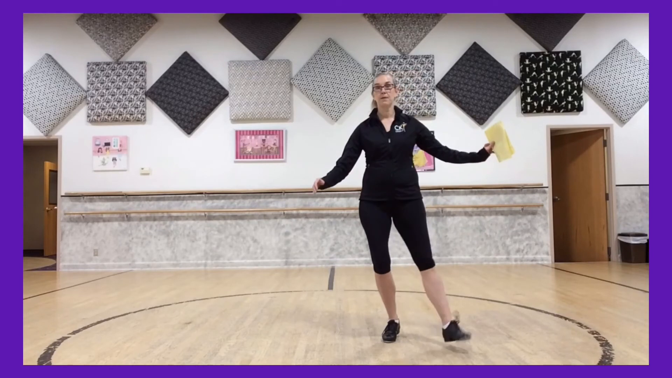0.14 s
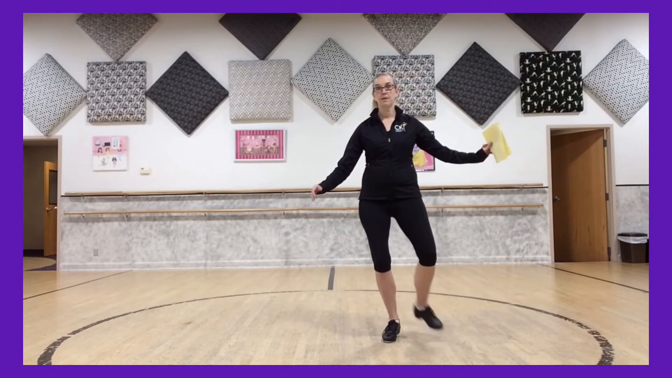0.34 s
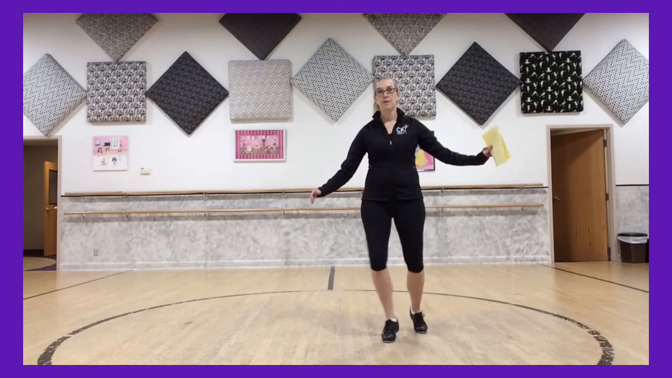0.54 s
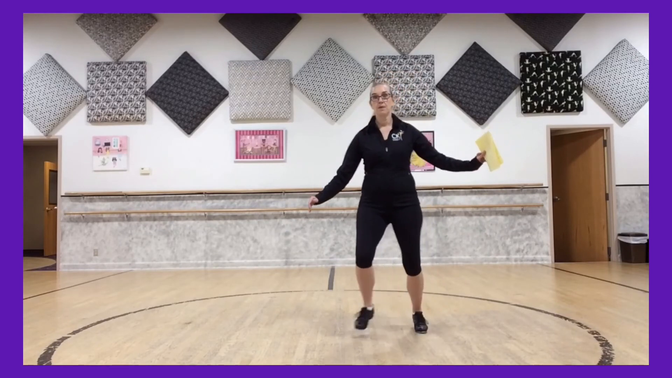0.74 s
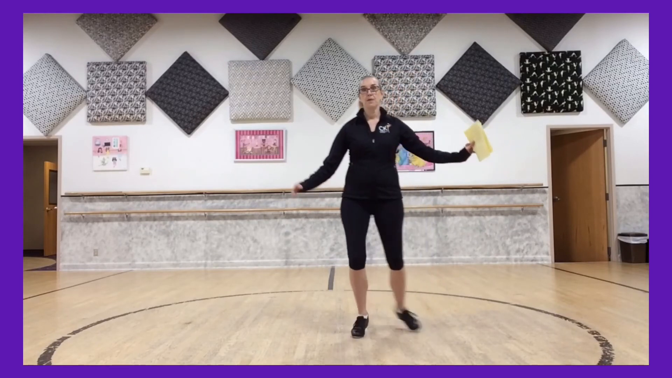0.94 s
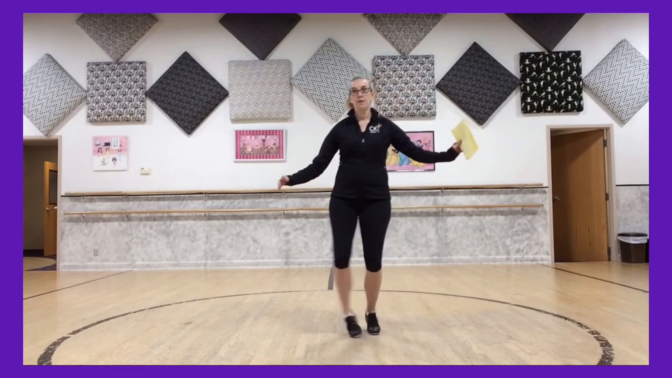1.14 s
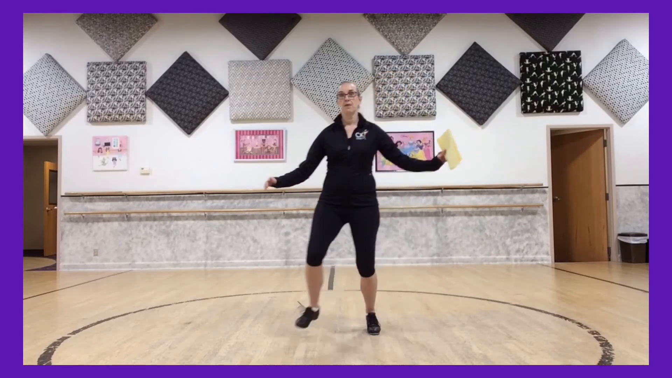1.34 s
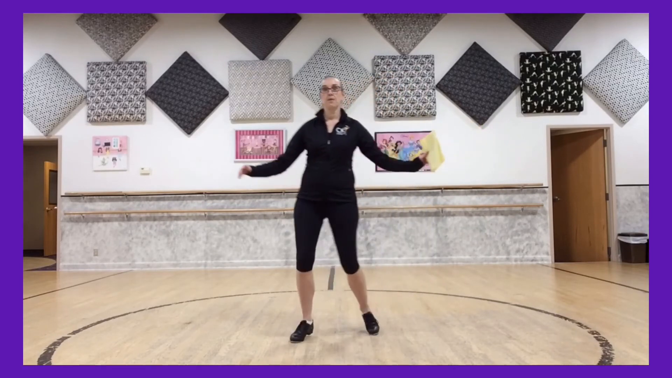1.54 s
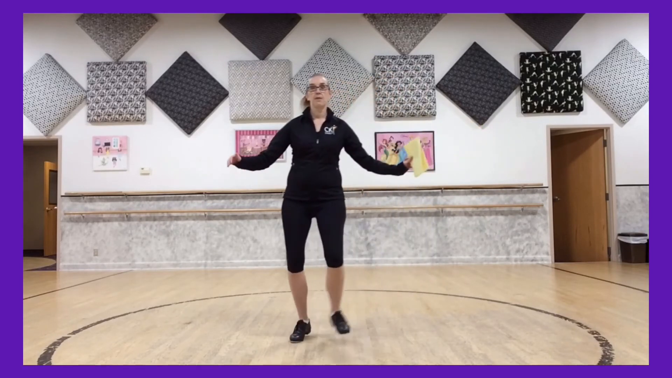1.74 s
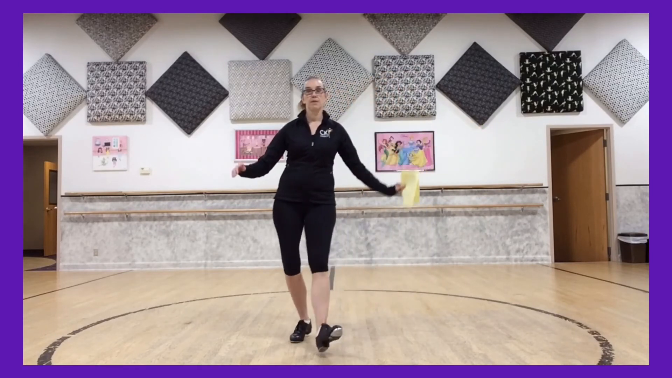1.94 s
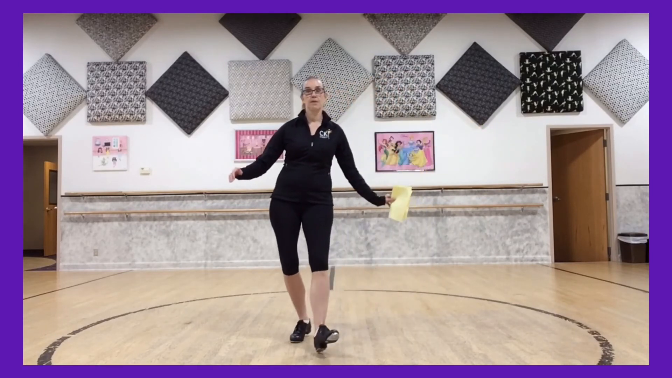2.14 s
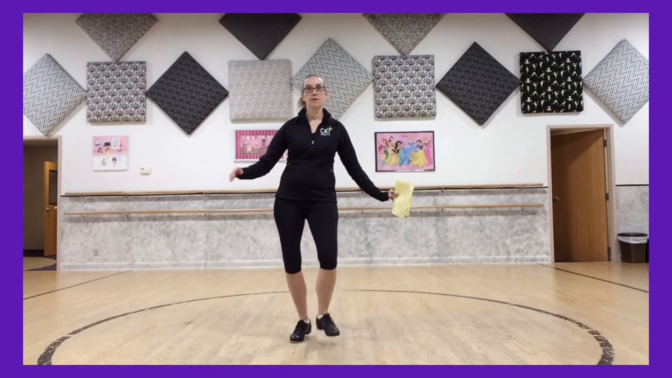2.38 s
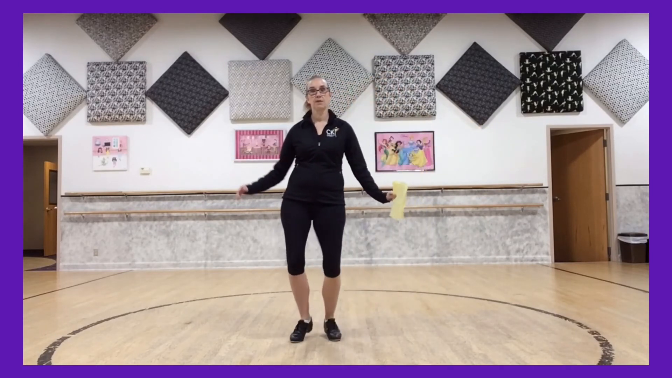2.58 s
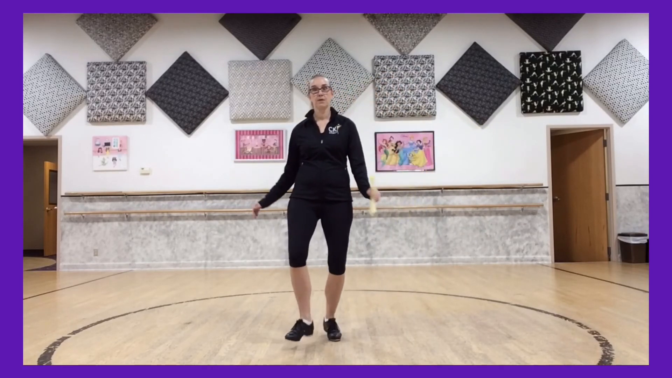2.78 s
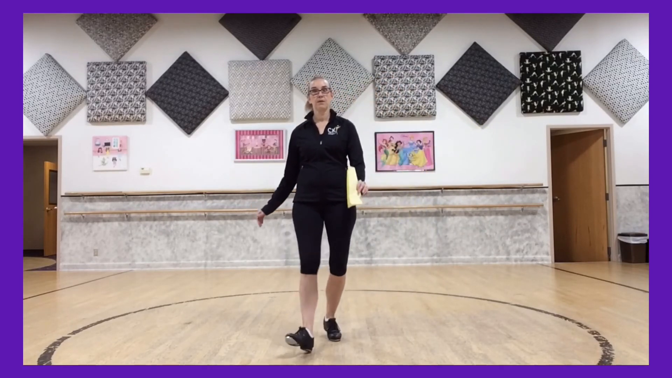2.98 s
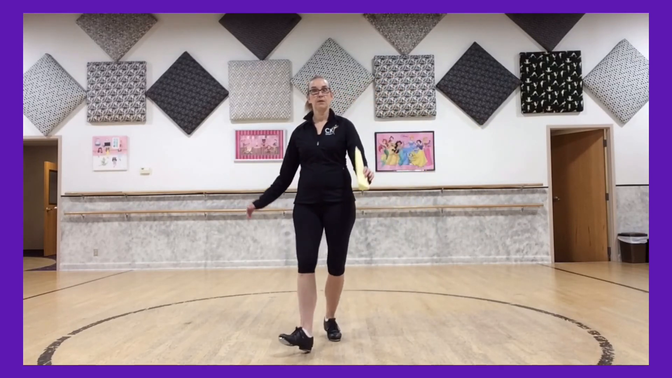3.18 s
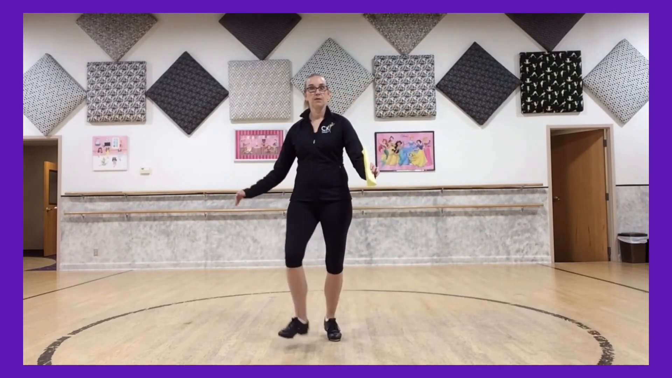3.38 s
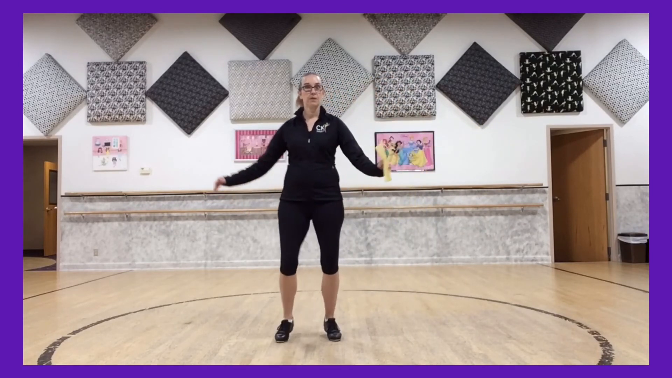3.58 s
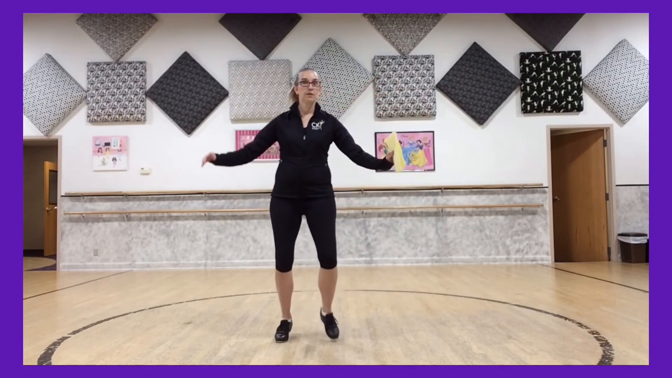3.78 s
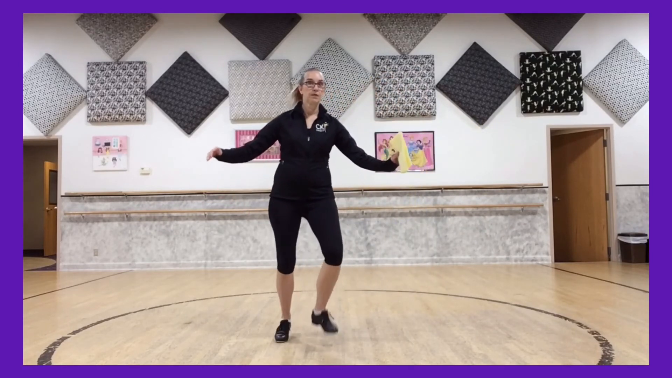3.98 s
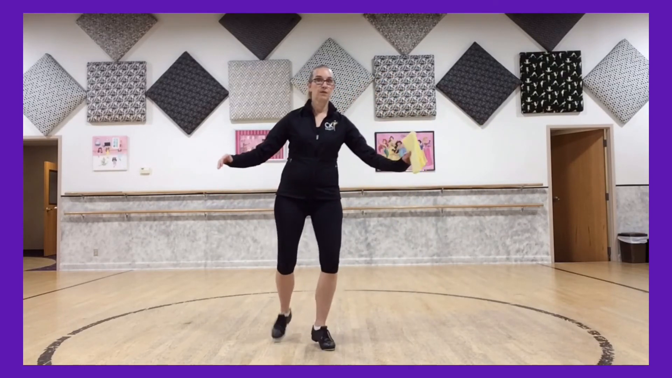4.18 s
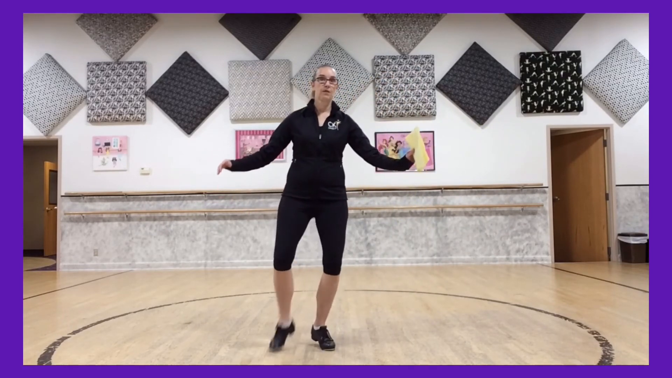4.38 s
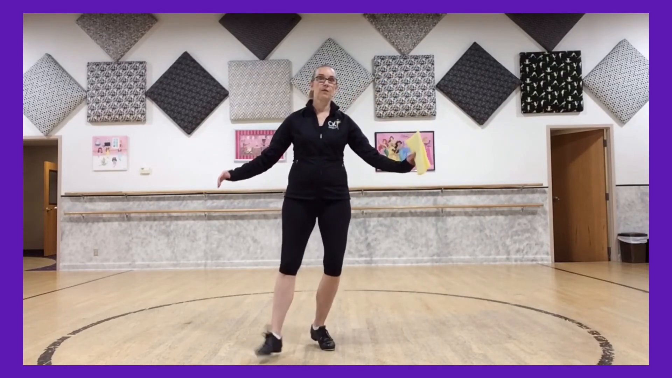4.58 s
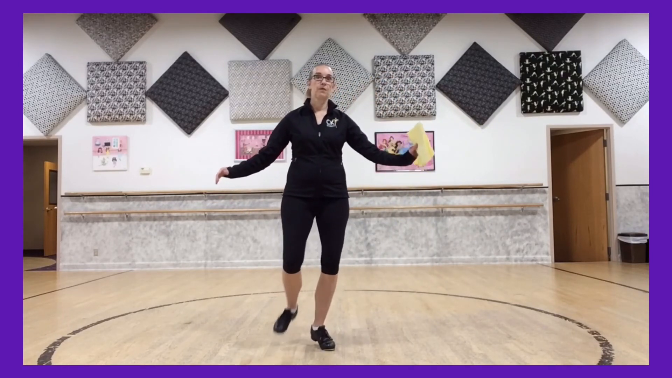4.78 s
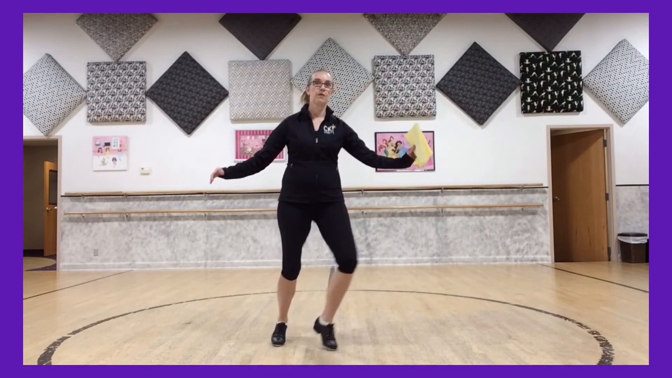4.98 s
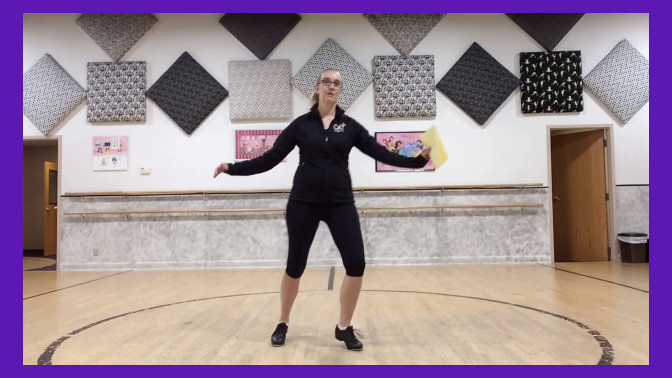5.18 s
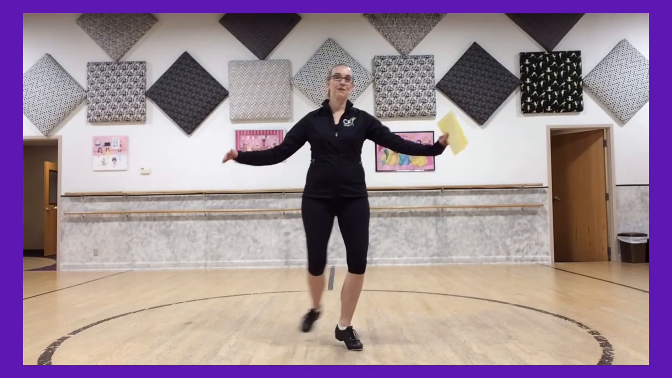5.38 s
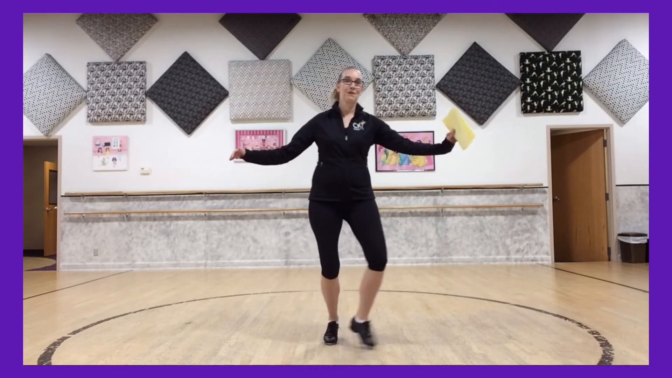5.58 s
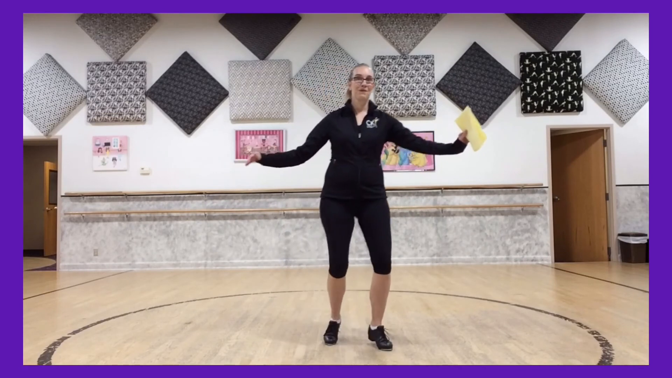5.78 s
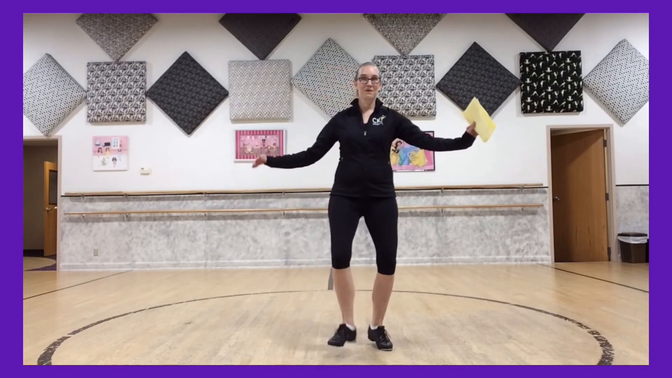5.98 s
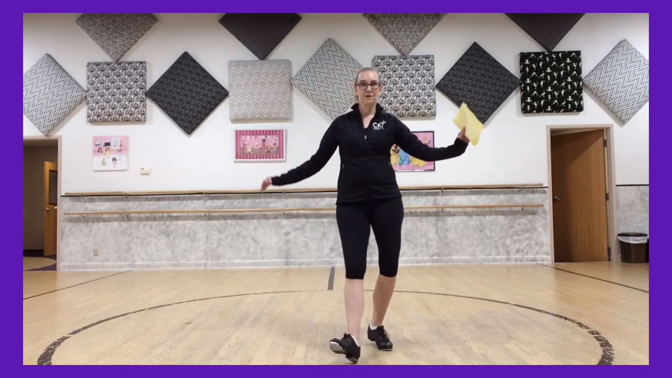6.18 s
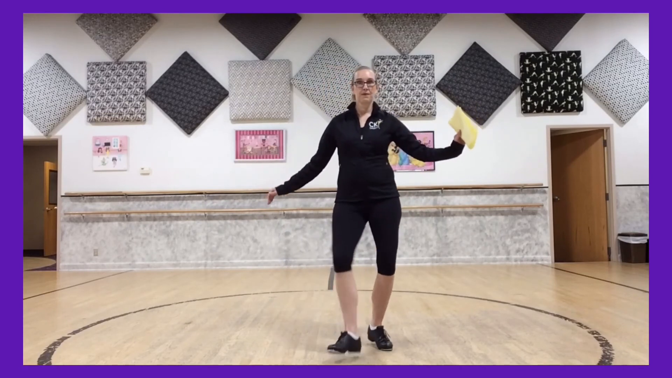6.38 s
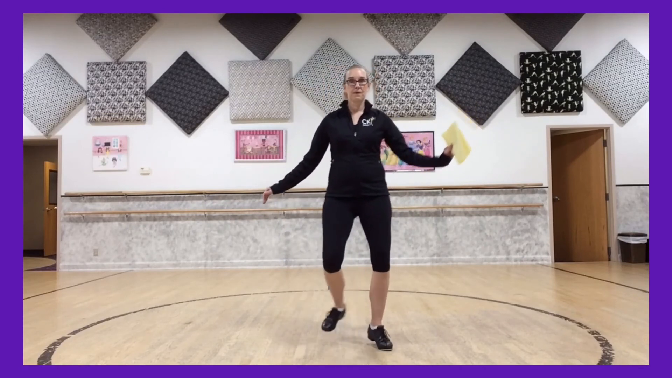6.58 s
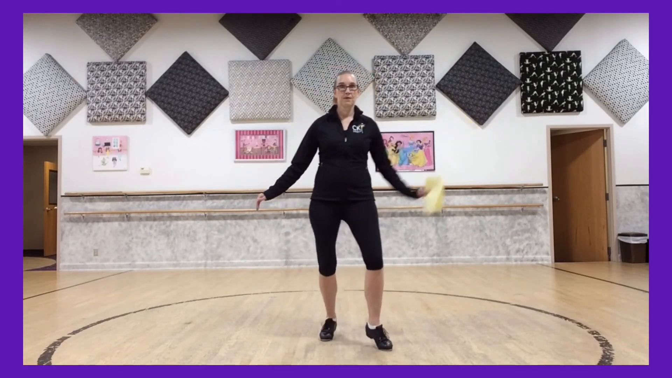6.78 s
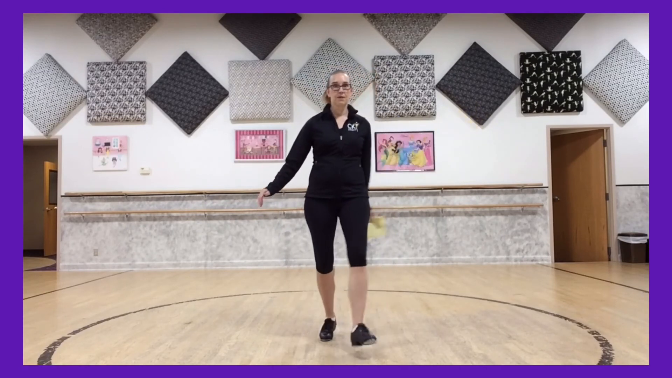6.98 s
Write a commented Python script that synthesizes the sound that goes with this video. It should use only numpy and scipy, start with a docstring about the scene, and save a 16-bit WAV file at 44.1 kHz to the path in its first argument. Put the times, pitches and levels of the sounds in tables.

```python
"""Tap steps in a live hall

A dancer in tap shoes steps out a slow phrase on the sprung wooden floor of a large, live hall, heard in one
channel by a microphone a few metres away. Each step is a glided knock (the bending wave in the boards), filtered
noise bursts for the click of the metal plate, and a low resonance for the floor's thump. Scattered bursts make the
wall echoes and banded, decaying noise makes about a second of reverberation, all over faint, steady room noise.
"""
import sys
import numpy as np
from scipy import signal
from scipy.fft import rfft, irfft
from scipy.io import wavfile

SR = 44100
rng = np.random.default_rng(int(sys.argv[2]) if len(sys.argv) > 2 else 0)


def file_out(sig):
    """Save sig as 16-bit WAV at sys.argv[1]."""
    # one column per channel
    cols = np.atleast_2d(sig).T
    # limit, then scale
    lim = np.clip(cols, -1, 1)
    pcm = np.round(lim * 32767).astype(np.int16)
    wavfile.write(sys.argv[1], SR, pcm)


N = 310023

# resonances and dips of boards and shoe, common to all steps: (centre [Hz], width [Hz], level [dB])
BODY_RESONANCES = [(31.77, 12, -6), (178.4, 39, 5.5), (312, 100, -1.5), (359, 28, 4), (465.4, 84, 6.5),
                   (602, 90, -2), (810, 107, 2), (1250, 290, -2), (2695, 150, 3), (10200, 810, 2.5)]
# basic spectrum of the plate's click: (frequency [Hz], level [dB])
CLICK_SPECTRUM = [(100, -26), (500, -5.5), (1100, -5), (2000, -0.5), (3200, 1.5), (6000, 0.5), (10000, 4.5),
                  (12500, -3.5), (16000, -6.5)]
# reverberation time of the hall, for a fall of 60 dB: (frequency [Hz], time [s])
HALL_DECAY = [(60, 0.57), (160, 0.97), (420, 0.85), (1100, 1.063), (2900, 0.95), (5500, 0.79), (8000, 0.49),
              (13000, 0.24)]
# first echoes from ceiling and walls: (delay [s], level [dB])
WALL_ECHOES = [(0.0133, -24.5), (0.017, -16.5), (0.0264, -12.5), (0.0313, -18), (.035, -13)]
# spectrum of the room noise: (frequency [Hz], level [dB per Hz])
ROOM_SPECTRUM = [(25, -101), (70, -83), (124, -84), (200, -88), (320, -100.5), (470, -85.5), (1100, -102),
                 (3000, -110), (6000, -117), (13000, -120), (16000, -138)]
# steps on the toe plate, the first one just before the start, so that only its tail is heard:
# (time [s], strike [dB], hardness of the contact [dB], board [dB], board pitch [Hz],
#  floor thump [dB], thump pitch [Hz], strongest plate resonance [Hz])
TOE_STEPS = [(-0.26, 7, -5, 14, 900, 19, 144, 2900), (0.028, 3.5, -2, 5, 1290, 13, 167, 5050),
             (0.2382, 8.5, 1, 12.5, 1076, 23, 144, 3100), (0.5574, 7.5, -7.5, -6, 995, 27, 180, 2670),
             (0.841, 6, 3.5, 14, 770, 23, 120, 2640), (1.157, 6.5, -2.5, 9, 840, 26, 151, 2380),
             (1.456, 8, 4.5, 15.5, 858, 28.5, 86.6, 7800), (2.519, 3.5, -1.5, 10, 824, 16, 210, 6030),
             (3.5414, 3, -1.5, 15, 800, 18, 105, 2580), (4.084, 9, 6.5, 21, 785, 26, 155, 2200),
             (4.4329, 6.5, -3.5, 12, 880, 18.5, 137, 4100), (4.649, 5, 6, 15, 810, 27, 122, 4800),
             (4.9481, 6.5, -2, 16.5, 784, 33, 83.5, 5400), (5.1812, 6, 3.5, 15.5, 835, 24, 122, 2810),
             (5.506, 10, -1, 18, 800, 19, 147, 9430), (5.7129, 2.5, -3, 11, 770, 19.5, 141, 3360),
             (6.6869, 8, -6, 15, 850, 18.5, 173.6, 4570)]
# heel drops: (time [s], strike [dB], hardness of the contact [dB], board [dB], board pitch [Hz],
#  floor thump [dB], strongest plate resonance [Hz], width of that resonance [Hz])
HEEL_DROPS = [(2.0218, 4.5, -9, 4, 516, 17.5, 5370, 450), (3.0021, -1.5, -3.5, 8, 642, 5, 3250, 993),
              (6.2016, -0.5, 4, 2.5, 640, 18, 3390, 1000)]

SIZE = 65536  # samples in one step with its tail
AGE = np.arange(SIZE) / SR  # s
FREQ = np.maximum(np.fft.rfftfreq(SIZE, 1 / SR), 1)  # Hz
LEAD_S = 0.012  # each step's sound opens this long before its click
TOP_HZ = 16000  # top of the recorder's range

# toe: sole clack and metal ping above the strike; lift of the plate resonance; direct knock against the board level
TOE_CLACK_DB, TOE_PING_DB, TOE_PLATE_DB, TOE_KNOCK_DB = 10, -3, 3, -25
TOE_WIDTH_HZ = 1130  # width of the toe plate's resonance
# heel: the body's weight damps the sole, so it hardly clacks; its small plate rings more
HEEL_CLACK_DB, HEEL_PING_DB, HEEL_PLATE_DB, HEEL_KNOCK_DB = -5, -12, 10, -24.5
HEEL_THUMP_HZ = 246  # higher than any toe thump
# a harder contact is louder [dB per dB of hardness] and brighter [dB per octave per dB of hardness]
CLICK_PER_HARD, TILT_PER_HARD = 0.43, 0.35
TILT_DB_PER_OCTAVE = -6.5  # tilt of the click at zero hardness
CLACK_HZ, EDGE_HZ = 1742, 10300  # pitch of the sole's clack; treble edge of the contact
# the plate's second landing: typical rate [Hz], its scatter [octaves], its share of the first [0-1]
BOUNCE_HZ, BOUNCE_OCTAVES, BOUNCE_SHARE = 880, 0.25, 0.23


def undb(db):
    """Decibels to gain."""
    return 10 ** (np.asarray(db) / 20)


def curve(points, hz):
    """Read (frequency [Hz], value) points on a log-frequency axis."""
    at, value = np.transpose(points)
    return np.interp(np.log(hz), np.log(at), value)


def unit(x):
    """Scale to an energy of one."""
    return x / np.sqrt(np.sum(x ** 2))


def bell(hz, width_hz):
    """Shape of a resonance in dB, one at its centre; the width is two standard deviations."""
    return np.exp(-2 * ((FREQ - hz) / width_hz) ** 2)


def hump(hz, q):
    """Gain of a broad resonance with steep skirts."""
    return 1 / (1 + (q * (FREQ / hz - hz / FREQ)) ** 2)


def ring(x, gain):
    """Pass x through the causal (minimum-phase) filter that has this gain."""
    cepstrum = irfft(np.log(gain + 1e-5))
    # fold the cepstrum onto positive time
    cepstrum[1:SIZE // 2] *= 2
    cepstrum[SIZE // 2 + 1:] = 0
    return irfft(rfft(x) * np.exp(rfft(cepstrum)))


def add(out, x, start_s):
    """Mix x into out from a time in seconds, dropping whatever lies outside."""
    i = int(round(start_s * SR))
    x, i = x[max(-i, 0):], max(i, 0)
    out[i:i + len(x)] += x[:N - i]


def room_noise():
    """Faint steady ventilation rumble and hiss: white noise shaped to the room's spectrum."""
    hz = np.maximum(np.fft.rfftfreq(N, 1 / SR), 1)
    spectrum = rfft(rng.standard_normal(N)) * undb(curve(ROOM_SPECTRUM, hz))
    return irfft(spectrum, N) * np.sqrt(SR / 2)  # from level per Hz to level over the whole band


def knock(hz, lead_s, rise_s=0.0011, fall_s=0.0011, glide=0.33):
    """A bending wave swells ahead of the click; its higher pitches travel faster, so it glides down."""
    t = AGE - lead_s
    cycles = np.cumsum(hz * (1 - glide * np.tanh(t / 0.0052))) / SR
    cycles = cycles - cycles[int(lead_s * SR)] - 0.06
    envelope = np.exp(-np.abs(t) / np.where(t < 0, rise_s, fall_s))
    return envelope * np.cos(2 * np.pi * cycles)


def forerunner(lead_s, rise_s=0.0025):
    """A faint hiss swells just before the click, as the boards carry it ahead of the air."""
    swell = np.exp(np.minimum(AGE - lead_s, 0) / rise_s) * (AGE < lead_s)
    return unit(rng.standard_normal(SIZE) * swell)


def contact(reflection_s=0.0014, reflection=0.65, rattle=1.15, rattle_s=0.0023):
    """The plate hits and rattles on its screws, and its sound comes back off the floor just behind it."""
    force = rattle * unit(rng.standard_normal(SIZE) * np.exp(-AGE / rattle_s))
    force[0] += 1
    force[int(reflection_s * SR * rng.uniform(0.8, 1.25))] += reflection
    return unit(force)


def plate_colour(spacing_hz=330, depth_db=2.3):
    """Each step lands on another spot of the plate and favours other modes, most of all in the treble."""
    at = np.arange(100) * spacing_hz
    uneven = np.interp(FREQ, at, rng.standard_normal(len(at)))
    return undb(depth_db * uneven * FREQ / (FREQ + 1200))


def bounce(rate_hz, share):
    """The plate lands twice, about a millisecond apart; the pair combs the spectrum into a metallic ring."""
    pair = 1 + share * np.exp(-2j * np.pi * FREQ / rate_hz)
    return np.abs(pair) / np.sqrt(1 + share ** 2)


def hall_bands(build_s=0.031, early=0.48, low_hz=420, flutter_s=0.0742, flutter=0.13):
    """Octave bands of the reverberation, each a (filter, envelope) pair with its own decay."""
    centres = 62.5 * 2 ** np.arange(9)
    # the treble must first come back from the walls
    airborne = np.interp(AGE, [0, 0.011, build_s - 0.002, build_s + 0.002], [0.15, early * 0.62, early, 1])
    # the floor radiates bass at once, and it throbs as it runs to and fro along the hall
    bass = 1 + flutter * np.cos(2 * np.pi * AGE / flutter_s) * np.minimum(AGE / flutter_s, 1)
    bands = []
    for hz, pick in zip(centres, np.eye(len(centres))):
        low = 1 / (1 + (hz / low_hz) ** 4)
        decay = undb(-60 * AGE / curve(HALL_DECAY, hz))
        envelope = (low * bass + (1 - low) * airborne) * decay
        band = np.interp(np.log(FREQ), np.log(centres), pick)
        bands.append((band, unit(envelope)))
    return bands


def hall(bands, echo_low_hz=700, grain_db=3.0, grain_s=0.0011, grain_fade_s=0.25, scatter_s=0.001):
    """The hall's answer to one step: a few distinct echoes and a grainy tail, new each time as the dancer moves."""
    # reflections arrive in clusters that merge as the sound ages
    spread = np.log(undb(grain_db)) * np.exp(-AGE / grain_fade_s)
    clusters = np.interp(AGE, np.arange(4000) * grain_s, rng.standard_normal(4000))
    grain = np.exp(spread * clusters - spread ** 2 * 2 / 3)
    noise = rfft(rng.standard_normal(SIZE) * grain)
    tail = np.zeros(SIZE)
    for band, envelope in bands:
        # the hall returns a fixed share of the energy in every octave
        share = np.sqrt(np.mean(band ** 2))
        tail += unit(irfft(noise * band) * envelope) * share
    echoes = np.zeros(SIZE)
    for delay_s, db in WALL_ECHOES:
        # each wall scatters the click into a short burst
        burst = unit(rng.standard_normal(SIZE) * np.exp(-AGE / scatter_s))
        arrival_s = delay_s + 0.0006 * rng.standard_normal()
        echoes += undb(db) * np.roll(burst, int(SR * arrival_s))
    # the echoes are thin in the bass
    return tail + ring(echoes, FREQ / (FREQ + echo_low_hz))


def step(bands, strike, hard, board, board_hz, thump, thump_hz, plate_hz, width_hz,
         clack_db, ping_db, plate_db, knock_db, push_db=-10, early_db=-17, direct_share=0.77,
         ping_hz=6000, thump_q=0.78, board_q=0.84, clack_q=0.73, ping_q=0.89):
    """One step: knock, click and floor push straight to the microphone, and the step again through the hall."""
    body = undb(sum(db * bell(hz, width) for hz, width, db in BODY_RESONANCES))
    bounce_hz = BOUNCE_HZ * 2 ** (BOUNCE_OCTAVES * rng.standard_normal())
    colour = body * plate_colour() * bounce(bounce_hz, BOUNCE_SHARE)
    plate = plate_db * bell(plate_hz, width_hz)
    floor = undb(thump) * hump(thump_hz, thump_q)

    # straight to the microphone
    octaves = np.log2(np.maximum(FREQ, 1300) / 3000)
    tilt = (TILT_DB_PER_OCTAVE + TILT_PER_HARD * hard) * octaves
    click = strike + CLICK_PER_HARD * hard + tilt + curve(CLICK_SPECTRUM, FREQ)
    snap = colour * undb(click + direct_share * plate)
    ahead = undb(board + knock_db) * ring(knock(board_hz, LEAD_S), body)
    ahead += undb(early_db) * ring(forerunner(LEAD_S), snap)
    impulse = 1.0 * (AGE == 0)
    direct = ring(contact(), snap) + ring(impulse, undb(push_db) * floor)

    # into the hall: floor, boards, sole and plate
    boards = undb(board) * hump(0.89 * board_hz, board_q)
    clack = undb(strike + clack_db) * hump(CLACK_HZ, clack_q)
    ping = undb(strike + hard + ping_db) * hump(ping_hz, ping_q)
    power = floor ** 2 + boards ** 2 + clack ** 2 + ping ** 2
    # the contact time limits how high the shoe rings
    radiated = np.sqrt(power / (1 + (FREQ / EDGE_HZ) ** 8))
    airborne = direct + ring(hall(bands), radiated * colour * undb(plate))
    return ahead + np.pad(airborne, (int(LEAD_S * SR), 0))[:SIZE]


def steps():
    """The phrase: toe steps and a few heel drops, all in the same hall."""
    out, bands = np.zeros(N), hall_bands()
    for time_s, strike, hard, board, board_hz, thump, thump_hz, plate_hz in TOE_STEPS:
        toe = step(bands, strike, hard, board, board_hz, thump, thump_hz, plate_hz, TOE_WIDTH_HZ,
                   TOE_CLACK_DB, TOE_PING_DB, TOE_PLATE_DB, TOE_KNOCK_DB)
        add(out, toe, time_s - LEAD_S)
    for time_s, strike, hard, board, board_hz, thump, plate_hz, width_hz in HEEL_DROPS:
        heel = step(bands, strike, hard, board, board_hz, thump, HEEL_THUMP_HZ, plate_hz, width_hz,
                    HEEL_CLACK_DB, HEEL_PING_DB, HEEL_PLATE_DB, HEEL_KNOCK_DB)
        add(out, heel, time_s - LEAD_S)
    return out


def scene():
    """The steps over the quiet hall, in one channel."""
    return (steps() + room_noise())[None]


def record(dry):
    """The recorder rounds the sharpest peaks and cuts the top."""
    rounded = 1.2 * np.tanh(dry / 1.2)
    top_cut = signal.ellip(8, 0.2, 70, TOP_HZ, fs=SR, output="sos")
    return signal.sosfilt(top_cut, rounded)


dry = scene()
out = record(dry)
file_out(out)
```